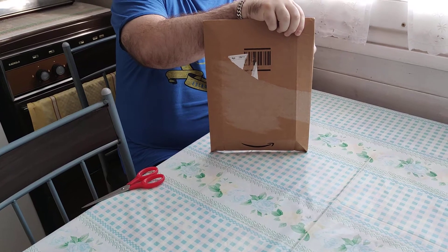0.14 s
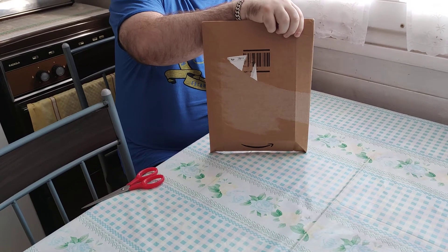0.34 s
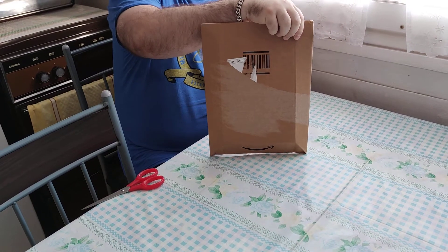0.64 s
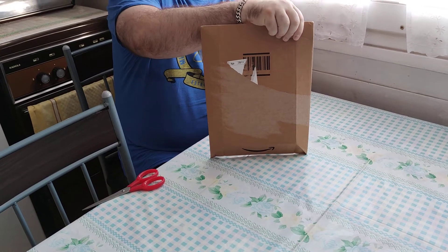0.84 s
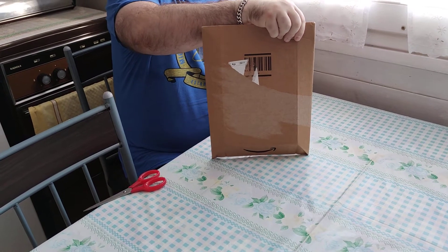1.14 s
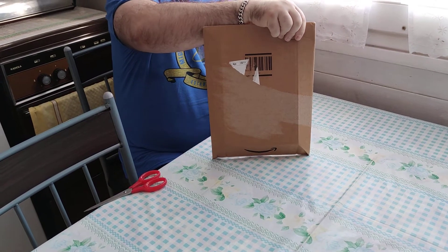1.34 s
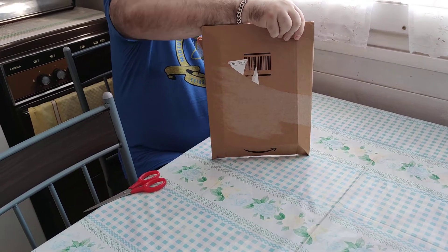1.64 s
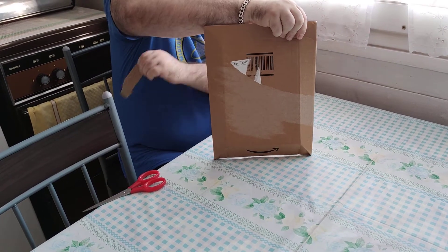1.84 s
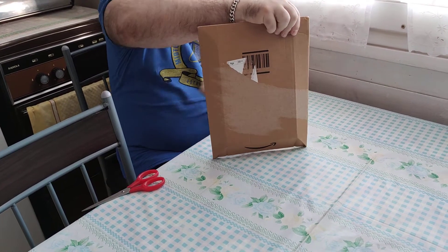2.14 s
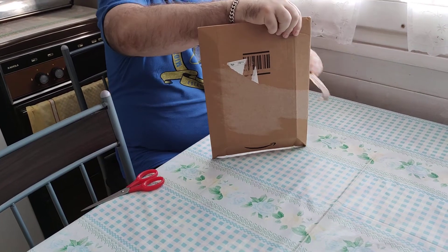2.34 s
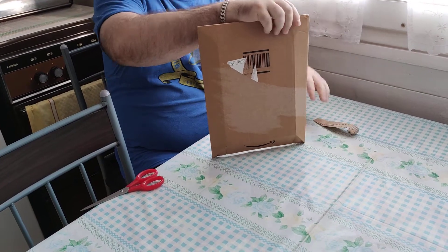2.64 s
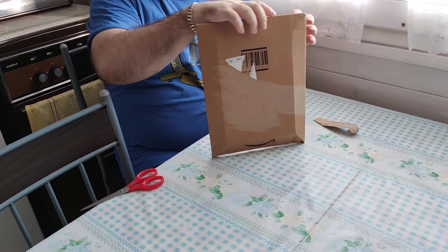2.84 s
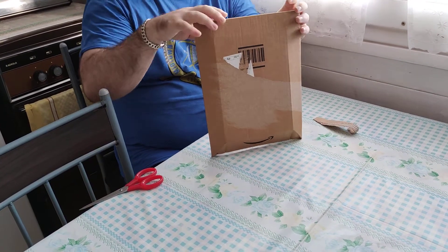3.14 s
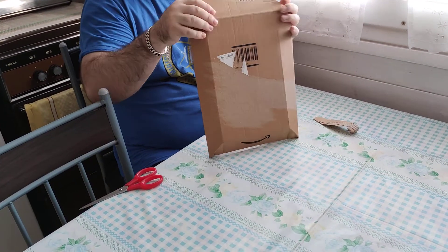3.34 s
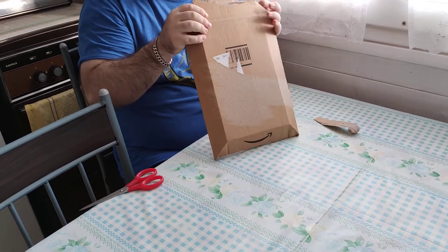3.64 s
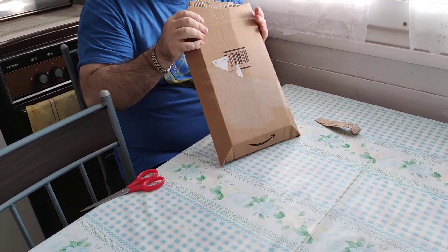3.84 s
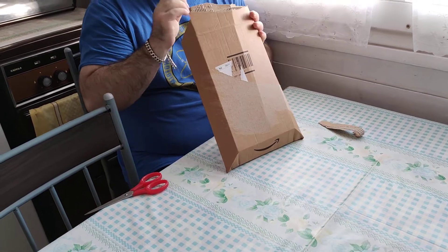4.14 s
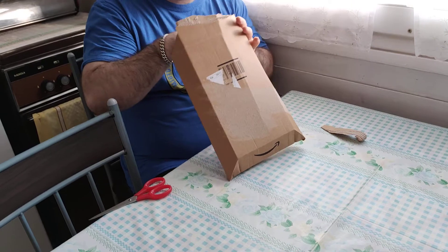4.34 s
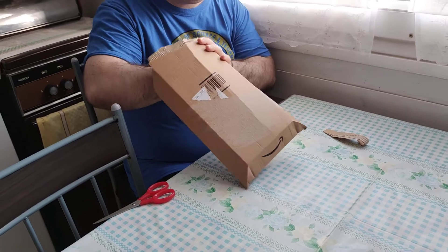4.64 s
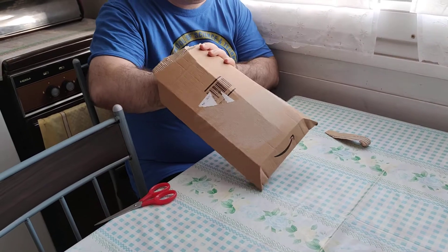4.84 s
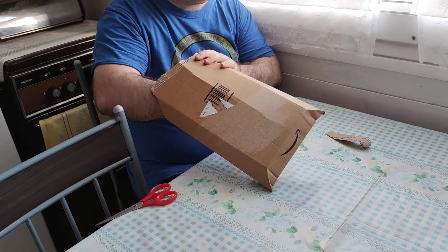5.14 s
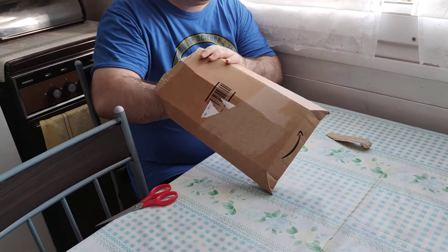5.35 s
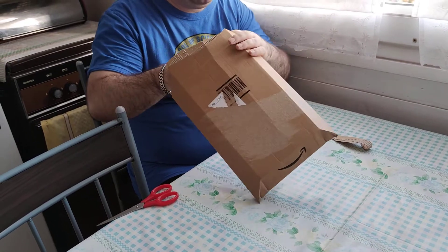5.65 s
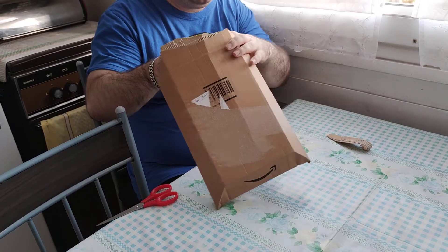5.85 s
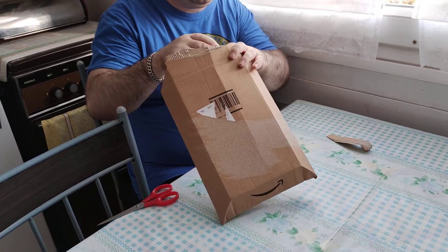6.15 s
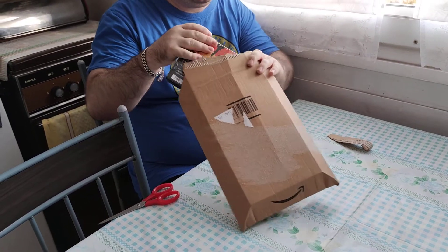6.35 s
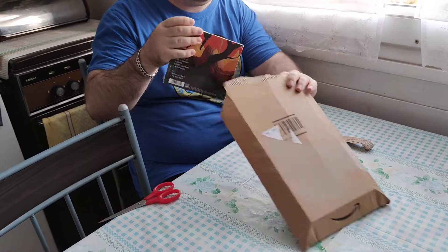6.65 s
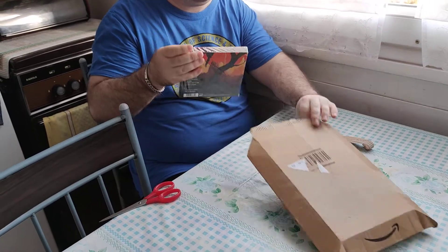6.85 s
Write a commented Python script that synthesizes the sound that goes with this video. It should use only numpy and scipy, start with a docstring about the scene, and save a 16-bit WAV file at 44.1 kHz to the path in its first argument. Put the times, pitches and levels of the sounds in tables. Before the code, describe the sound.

A cardboard mailer's strip is torn off in a few loud, crackling rips, followed by hollow rustling, scraping, knocks and pops in a small kitchen.

```python
"""Kitchen table, small hard room: the tear strip of a cardboard mailer is ripped off in a few quick pulls.
Fibres snap as random impulses in dense bunches, coloured by the flap and by modes of the panels.
Hands rub the card (filtered impulses), pop a panel and slide out a wrapped case, with knocks and scuffs.
Each layer passes through random room responses; room air and soft table bumps lie beneath."""
import sys
import numpy as np
from scipy import signal
from scipy.fft import rfft, irfft, next_fast_len
from scipy.io import wavfile
from scipy.ndimage import uniform_filter1d, map_coordinates

SR = 44100
rng = np.random.default_rng(int(sys.argv[2]) if len(sys.argv) > 2 else 0)


def transcribe(u):
    """Save the signal u as a 16-bit wav file named by the first command-line argument.

    u: samples, shape (n,) or (channels, n), limited to [-1, 1]; the rate is SR.
    q: integer samples, one column per channel.
    """
    v = np.clip(np.atleast_2d(u).T, -1, 1)
    q = np.round(v * 32767).astype(np.int16)
    wavfile.write(sys.argv[1], SR, q)


N = 309141  # samples

# All table levels are relative, before layer gains.
# Room air spectrum: [freq_hz, level_db]
AIR_SPECTRUM = [(15, -27), (25, 1.5), (114, -12), (591, -16), (1040, -24), (1230, -21), (2550, -25),
                (2990, -33), (7510, -29.5), (9320, -27.5), (16000, -34.5)]
# Soft table bumps and rumbles, bell-shaped: [centre_s, level_db, spread_s]
TABLE_BUMPS = [(.105, -52, 0.016), (.72, -60, 0.17), (2.15, -73, .08), (2.33, -60, 0.018),
               (3.76, -54, 0.034), (3.86, -54.5, 0.05), (5.55, -57, 0.07), (5.9, -53, 0.057),
               (6.47, -54, 0.034)]
# Left-right likeness of diffuse sound: [freq_hz, correlation]
EAR_LIKENESS = [(25, 0.056), (60, 0), (120, 0.66), (300, .88), (600, 0.59), (1200, 0), (3000, 0)]
# Room decay: [freq_hz, t60_s]
ROOM_DECAY = [(100, 0.26), (400, 0.3), (1000, 0.28), (2300, 0.32), (5000, 0.29), (8000, 0.31),
              (15000, 0.21)]

# Single hand strokes over the card: [start_s, length_s, hollow_db, scrape_db, hiss_db]
STROKE_EVENTS = [(0.0, 0.06, -61, -71.5, -69.5), (0.297, 0.17, -67.5, -69, -68.5),
                 (0.44, 0.095, -54, -62.5, -54.5), (0.551, 0.046, -52, -49.5, -55.5),
                 (0.695, 0.41, -56.5, -61, -61.5), (1.079, 0.091, -76, -62, -62),
                 (1.984, 0.16, -63, -57.5, -60.5), (2.241, 0.22, -83, -92.5, -77.5),
                 (2.55, .06, -70, -67, -52.5), (2.651, 0.29, -75, -57, -56), (2.857, 0.059, -50, -52, -52),
                 (2.968, .17, -54.5, -55.5, -54), (3.232, 0.3, -57, -55.5, -62),
                 (3.598, .07, -63, -47.5, -53.5), (3.825, 0.07, -51.5, -58, -62.5),
                 (3.957, 0.087, -56, -55.5, -55.5), (4.163, .09, -55, -79, -81),
                 (4.253, 0.126, -62, -64, -66), (4.426, 0.096, -60, -53.5, -46),
                 (4.605, 0.15, -48.5, -50.5, -51.5), (4.944, 0.017, -45, -53.5, -47.5),
                 (5.06, .05, -50.5, -60, -55), (5.19, 0.11, -45, -53, -80), (5.412, 0.11, -53, -55, -47.5),
                 (5.776, .13, -66, -52, -46), (6.146, 0.073, -51.5, -55.5, -54),
                 (6.708, 0.061, -51.5, -54.5, -53.5)]
# Steady rubbing inside the mailer, case sliding out: [time_s, hollow_db, scrape_db, hiss_db]
RUMMAGE_LEVELS = [(4.43, -54, -61, -73), (4.51, -63, -61.5, -65), (4.62, -67, -53, -44),
                  (4.72, -46.5, -51, -54.5), (5.12, -60.5, -58, -55.5), (5.38, -43.5, -49.5, -53),
                  (5.59, -48, -47.5, -50), (5.77, -54.5, -53, -53), (5.98, -60, -60, -58.5),
                  (6.63, -56, -58, -53.5), (6.78, -67, -64.5, -52), (7.0, -66, -65, -60)]
# Boom of the hollow mailer: [freq_hz, level_db]
HOLLOW_SPECTRUM = [(76, -33.5), (130, -9.5), (211, -9.5), (247, -12), (307, -1), (376, -11.5), (412, -1),
                   (454, -5.5), (834, -3.5), (904, -2), (1100, -14.5), (1430, -41.5), (2420, -120)]
# Card grain, middle band: [freq_hz, level_db]
SCRAPE_SPECTRUM = [(500, -30.5), (1000, -7), (1500, -4), (2300, -3), (3000, -13), (4500, -35.5)]
# Card grain, treble: [freq_hz, level_db]
HISS_SPECTRUM = [(1800, -31.5), (3000, 0.5), (5000, 1), (7400, 3), (11000, 3.5), (15000, -1)]
# Quick finger swipes along the open edge, bell-shaped: [centre_s, level_db, spread_s]
EDGE_SWIPES = [(3.461, -41, .013), (3.68, -45, 0.025)]

# Taps and buckling creases: [start_s, level_db, ring_hz, crack_db re the tap]
KNOCK_EVENTS = [(0.049, -54, 1520, 2.5), (0.48, -26, 1310, -22.5), (0.709, -39, 700, -17),
                (1.067, -45, 266, -25), (1.104, -41, 703, -23), (2.56, -51.5, 2100, -3.5),
                (2.677, -35, 294, -22.5), (3.239, -35.5, 290, -13.5), (3.492, -40.5, 310, -21),
                (3.754, -39.5, 310, -23), (3.887, -33.5, 860, -8), (4.181, -41.5, 404, -31.5),
                (4.253, -45.5, 564, -39), (4.555, -21, 725, -11.5), (4.959, -31, 2630, -6.5),
                (5.166, -28.5, 400, -16), (5.243, -33.5, 312, -19.5), (5.938, -37, 445, -7),
                (6.133, -36.5, 820, -19), (6.276, -37.5, 520, -16.5), (6.579, -34, 604, -37),
                (6.988, -29, 540, -17)]
# Dull body of a tap on card: [freq_hz, level_db]
TAP_SPECTRUM = [(70, -12.5), (170, -3.5), (300, 1), (500, -4.5), (1000, -6.5), (2000, -7), (3500, -19.5),
                (9000, -31.5)]
# Crack of a tap: [freq_hz, level_db]
CRACK_SPECTRUM = [(1500, 4.5), (3500, 0), (7000, -0.5), (10000, -3), (16000, -11.5)]
# Card drags and judders at one pitch, bell-shaped: [centre_s, level_db, spread_s, pitch_hz]
SCUFF_EVENTS = [(0.128, -60.5, 0.043, 270), (2.9, -54, 0.029, 437), (4.487, -49.5, 0.014, 468),
                (4.62, -47, 0.017, 740), (5.287, -44, 0.019, 770), (5.856, -45.5, 0.041, 400),
                (6.22, -49, 0.033, 1430), (6.545, -47.5, 0.076, 755)]

# Pulls on the strip; the free flap rings differently as the tear moves on:
# [start_s, rise_s, hold_s, release_t60_s, snap_db, thrum_db, flap_hz, flap_width_hz, flap_db]
STRIP_PULLS = [(0.866, 0.014, 0.014, 0.064, -28.5, -42, 4780, 688, 5),
               (1.231, 0.022, 0.094, 0.042, -40, -58.5, 2470, 417, 0.5),
               (1.361, 0.031, .055, 0.071, -13.5, -26.5, 2494, 423, 8),
               (1.606, 0.02, 0.053, .17, -16, -29.5, 7100, 540, -7.5),
               (1.799, 0.031, 0.01, 0.057, -15, -21.5, 1316, 261, 9.5)]
# Tough spots giving way: [start_s, snap_db, thrum_db]
TEAR_JERKS = [(0.871, -15.5, -26), (0.881, -21.5, -29), (1.238, -37, -44), (1.277, -24, -41.5),
              (1.366, -15.5, -29), (1.449, -15, -39.5), (1.607, -14.5, -44), (1.622, -13.5, -31),
              (1.799, -25.5, -25), (1.832, -10.5, -30)]
# Snapping fibres: [freq_hz, level_db]
FIBRE_SPECTRUM = [(60, -37.5), (150, -21), (500, -8.5), (900, -6), (1080, -4.5), (1300, -4), (2000, 2),
                  (2700, -2.5), (3600, -4.5), (4700, 0), (6000, -0.5), (7400, 1.5), (16000, -5)]
# Panel modes: [centre_hz, width_hz, level_db]
PANEL_MODES = [(96.1, 8.2, 1.5), (179, 51, 1.5), (209, 55, 3), (312, 31, 3), (402.6, 39, 1), (538, 45, -1),
               (681, 46, -2), (775, 38, -1)]
# Kitchenware modes: [freq_hz, level_db, t60_s]
METAL_MODES = [(1245, -5, 0.88), (1940, -2.5, 0.57), (2170, -2.5, 0.5), (2675, -4.5, 1), (3360, -9.5, 0.6),
               (6573, -11.5, 0.76)]

# A panel flips over with a hollow pop: [start_s, level_db, pitch_hz, t60_s]
POP_EVENTS = [(4.561, -43, 720, 0.036), (5.372, -13, 430, 0.013), (5.392, -22.5, 432, 0.057),
              (6.579, -35.5, 392, 0.023)]
# Microphone treble response: [freq_hz, level_db]
MIC_RESPONSE = [(7700, 0), (8300, -8.5), (9200, -16.5), (12000, -12), (15000, -9)]

STROKE_ATTACK_S, STROKE_T60_S, STROKE_SAG_DB_PER_S = 0.03, 0.39, 6
RUMMAGE_DB = -1
CRINKLE_PER_S, CRINKLE_DB = 52, -7.5  # mean crease rate; level re the scrape gain
BITE_DB = 10.5  # a pull starts this far under full strength
JERK_T60_S = 0.028
TOP_HZ = 16000  # band limit


def amp(db):
    """Decibels to gain."""
    return 10 ** (np.asarray(db) / 20)


def unit(x):
    """Scale to rms 1."""
    return x / np.sqrt(np.mean(x ** 2) + 1e-20)


def along(points, hz):
    """Table of (freq_hz, value) interpolated on a log frequency axis."""
    f, values = np.transpose(points)
    return np.interp(np.log(hz + 1), np.log(f + 1), values)


def clock():
    """Time of each sample, s."""
    return np.arange(N) / SR


def gains(rows):
    """A gain curve per dB column, near silent outside the table's times."""
    times_s, *columns = np.transpose(rows)
    return [amp(np.interp(clock(), times_s, db, left=-120, right=-120)) for db in columns]


def swells(rows):
    """Sum of Gaussian rises of level."""
    return sum(amp(db) * np.exp(-.5 * ((clock() - s) / spread_s) ** 2) for s, db, spread_s in rows)


def wobble(rate_hz):
    """Smooth random curve through rate_hz random knots a second."""
    knots = rng.standard_normal(int(N * rate_hz / SR) + 4)
    return map_coordinates(knots, [clock() * rate_hz])


def filtered(x, response):
    """Apply a response of frequency by FFT, padded against wrap-around."""
    size = next_fast_len(N + SR // 2)
    spectrum = rfft(x, size) * response(np.fft.rfftfreq(size, 1 / SR))
    return irfft(spectrum, size)[..., :N]


def coloured(x, spectrum):
    """Filter by a (freq_hz, level_db) table, then scale to rms 1."""
    return unit(filtered(x, lambda hz: amp(along(spectrum, hz))))


def resonance(f, centre_hz, width_hz, db):
    """Complex response of one damped mode."""
    return amp(db) * 1j * f * width_hz / (centre_hz ** 2 - f ** 2 + 1j * f * width_hz)


def snaps(rate_hz, spread_db):
    """Impulses at random times, of random sign and widely varying size, rms 1."""
    size = amp(spread_db * np.clip(rng.standard_normal(N), -2, 2))
    sign = rng.choice([-1, 1], N)
    return unit(size * sign * (rng.random(N) < rate_hz / SR))


def diffuse(size):
    """Stereo noise whose left-right correlation follows EAR_LIKENESS."""
    likeness = np.clip(along(EAR_LIKENESS, np.fft.rfftfreq(size, 1 / SR)), -1, 1)
    turn = np.arccos(likeness) / 2
    noise = rfft(rng.standard_normal((2, size)))
    mid, side = irfft(noise * [np.cos(turn), np.sin(turn)], size)
    return np.array([mid + side, mid - side])


def kitchen(wet_db, early_db, lag_s):
    """Room response: direct sound, dense early reflections and a short diffuse tail."""
    size = SR // 3
    hz, frame_s, z = signal.stft(diffuse(size), SR, nperseg=256)
    decay = amp(-60 * frame_s / along(ROOM_DECAY, hz)[:, None])
    tail = signal.istft(z * decay, SR, nperseg=256)[1][:, :size]
    t = np.arange(tail.shape[1]) / SR
    tail = tail * (1 - np.exp(-t / 0.0049))
    early = diffuse(len(t)) * np.exp(-t / 0.0059)
    answer = amp(wet_db) * tail / np.linalg.norm(tail[0])
    answer = answer + amp(early_db) * early / np.linalg.norm(early[0])
    answer[0, int(abs(lag_s) * SR)] += 1  # direct sound, later at left
    answer[1, 0] += 1
    return answer / np.linalg.norm(answer[0])


def moving(x, wet_db, early_db, lag_s, count=24):
    """Hands and mailer move: crossfaded stretches each get a freshly drawn room response."""
    out, hop = np.zeros((2, N + 3 * SR)), N // count + 1
    fade = np.sin(np.pi * (np.arange(2 * hop) + .5) / (2 * hop)) ** 2
    x = np.pad(x, (hop, 2 * hop))
    for start in range(0, N + hop, hop):
        stretch = x[start:start + 2 * hop] * fade
        part = signal.fftconvolve(stretch[None], kitchen(wet_db, early_db, lag_s), axes=1)
        out[:, start:start + part.shape[1]] += part
    return out[:, hop:hop + N]


def bassless(x, corner_hz):
    """High-pass: a light sheet of card radiates no deep bass."""
    return signal.sosfilt(signal.butter(3, corner_hz, "highpass", fs=SR, output="sos"), x)


def background():
    """Steady diffuse room air, plus low-frequency noise swells for the table bumps."""
    rumble = coloured(diffuse(N), [(20, 0), (40, 33), (130, 25), (300, -19), (700, -50)])
    bumps = swells(TABLE_BUMPS) * rumble
    return amp(-59) * coloured(diffuse(N), AIR_SPECTRUM) + bumps


def hands():
    """Strokes and rummaging added in power; returns gains of (hollow, scrape, hiss)."""
    power, t = np.zeros((3, N + SR)), np.arange(SR) / SR
    for s, length_s, *levels_db in STROKE_EVENTS:
        lift_db = 60 * np.maximum(t - length_s, 0) / STROKE_T60_S
        fall_db = STROKE_SAG_DB_PER_S * t + lift_db
        shape = np.minimum(t / STROKE_ATTACK_S, 1) * amp(-fall_db)
        power[:, round(s * SR):][:, :SR] += np.outer(amp(levels_db), shape) ** 2
    rummage = amp(RUMMAGE_DB) * np.array(gains(RUMMAGE_LEVELS))
    return np.sqrt(power[:, :N] + rummage ** 2)


def patchy(x, depth_db, size=7):
    """Contact points wander over the card: a smoothed random time-frequency gain shifts its colour."""
    z = signal.stft(x, nperseg=512)[2]
    field = rng.standard_normal(z.shape)
    for axis in (0, 0, 1, 1):
        field = uniform_filter1d(field, size, axis)
    return unit(signal.istft(z * amp(depth_db * unit(field)), nperseg=512)[1][:N])


def rubbing():
    """Skin and wrap catch on the card's grain; the hollow of the mailer booms along."""
    body, scrape, hiss = hands()
    grip = unit(amp(1.4 * wobble(45)))
    hollow = body * amp(0.994 * wobble(25))
    hollow = hollow * coloured(snaps(rate_hz=1300, spread_db=2.5), HOLLOW_SPECTRUM)
    grain = coloured(snaps(rate_hz=2200, spread_db=4.5), SCRAPE_SPECTRUM)
    grain = scrape * amp(4) * patchy(grain, depth_db=2)
    fizz = coloured(snaps(rate_hz=11000, spread_db=4.5), HISS_SPECTRUM)
    fizz = hiss * amp(8.5) * patchy(fizz, depth_db=2)
    edge_spectrum = [(200, -3.5), (700, -1), (2000, 3), (4000, -1), (14000, -7.5)]
    edge = coloured(snaps(rate_hz=5500, spread_db=5.5), edge_spectrum)
    swipes = swells(EDGE_SWIPES) * amp(6.5) * edge
    crease_spectrum = [(300, -14.5), (1500, 1.5), (7000, -3.5), (15000, -7)]
    creases = coloured(snaps(rate_hz=CRINKLE_PER_S, spread_db=3), crease_spectrum)
    crinkle = scrape * amp(CRINKLE_DB) * creases
    return grip * (hollow + grain + fizz + swipes + crinkle)


def noise_burst(size, colour):
    """White noise shaped by a response, rms 1."""
    return unit(irfft(rfft(rng.standard_normal(size)) * colour, size))


def knocks():
    """Each tap is a brief crack and a dull, quickly damped ring of the card."""
    out, t = np.zeros(N + SR), np.arange(SR // 8) / SR
    f = np.fft.rfftfreq(len(t), 1 / SR)
    onset = 1 - np.exp(-t / 0.00069)
    for s, db, ring_hz, crack_db in KNOCK_EVENTS:
        low_cut = f / np.hypot(f, ring_hz / 2)
        ring = low_cut * (0.5 + resonance(f, ring_hz, ring_hz / 2, db=-5))
        thud = noise_burst(len(t), amp(along(TAP_SPECTRUM, f)) * ring) * amp(-60 * t / .04)
        crack = noise_burst(len(t), amp(along(CRACK_SPECTRUM, f))) * amp(-60 * t / .02)
        hit = amp(db + 2) * thud + amp(db + crack_db + 17.5) * crack
        out[round(s * SR):][:len(t)] += hit * onset
    return out[:N]


def scuffs():
    """Stick and slip excite one resonance of the card at a time."""
    judder = snaps(rate_hz=390, spread_db=2)
    out = np.zeros(N)
    for s, db, spread_s, hz in SCUFF_EVENTS:
        tone = unit(filtered(judder, lambda f: resonance(f, hz, 0.37 * hz, db=0) ** 2))
        out += swells([(s, db + 0.5, spread_s)]) * tone
    return out


def gesture(s, attack_s, hold_s, t60_s, bite_db):
    """Gain of a pull: starts bite_db under full strength, builds, holds and dies away."""
    t = clock() - s
    build_db = -bite_db * np.clip(1 - t / attack_s, 0, 1)
    db = build_db - 60 * np.maximum(t - attack_s - hold_s, 0) / t60_s
    return (t >= 0) * amp(np.maximum(db, -200))


def jerks(pull):
    """Sudden decaying releases nearest in time to one pull; returns gains of (snap, thrum)."""
    out, t = np.zeros((2, N)), np.arange(SR // 8) / SR
    for s, *levels_db in TEAR_JERKS:
        nearest = np.argmin([abs(s - row[0]) for row in STRIP_PULLS])
        if nearest == pull:
            release = np.outer(amp(levels_db), amp(-60 * t / JERK_T60_S))
            out[:, round(s * SR):][:, :len(t)] += release
    return out


def panel_response(f):
    """Sum of the panel modes with alternating sign."""
    return sum((-1) ** k * resonance(f, *mode) for k, mode in enumerate(PANEL_MODES))


def tear():
    """Fibres snap in bunches that colour the flap and shake the panels; returns (crackle, thrum)."""
    crackle, drum = np.zeros((2, N))
    for pull, row in enumerate(STRIP_PULLS):
        s, rise_s, hold_s, t60_s, snap_db, thrum_db, flap_hz, width_hz, flap_db = row
        envelope = gesture(s, rise_s, hold_s, t60_s, BITE_DB)
        ripping = np.outer(amp([snap_db, thrum_db]), envelope)
        snap, thrum = np.hypot(ripping, jerks(pull))
        bunches = unit(amp(3.8 * wobble(330)))
        fibres = snaps(rate_hz=3500, spread_db=4.5) * bunches

        def flap_response(f):
            """Fibre spectrum with the free flap's resonance."""
            return amp(along(FIBRE_SPECTRUM, f)) * (2.5 + resonance(f, flap_hz, width_hz, flap_db))

        crackle += snap * unit(filtered(fibres, flap_response))
        drum += thrum * unit(filtered(fibres, panel_response))
    return crackle, drum


def kitchenware(x):
    """Metal things in the room ring along faintly: decaying sines, random phase per side."""
    t = np.arange(SR) / SR
    ring = np.zeros((2, SR))
    for hz, db, t60_s in METAL_MODES:
        ring += amp(db - 60 * t / t60_s) * np.sin(2 * np.pi * (hz * t + rng.random((2, 1))))
    return amp(-66) * signal.fftconvolve(x[None], ring, axes=1)[:, :N]


def pops():
    """A panel flips with a crack and rings the air inside the mailer."""
    out, t = np.zeros(N + SR), np.arange(SR // 8) / SR
    onset = 1 - np.exp(-t / 0.00055)
    for s, db, hz, t60_s in POP_EVENTS:
        swing = np.sin(2 * np.pi * hz * t) + amp(-14) * np.sin(2 * np.pi * 235 * t)
        crack = unit(signal.lfilter([1], [1, -.85], rng.standard_normal(len(t))))
        decay = amp(db + 5 - 60 * t / t60_s)
        out[round(s * SR):][:len(t)] += decay * (swing + amp(-12.5) * crack) * onset
    return out[:N]


def scene():
    """Put each layer in the room, balance slightly to the left, add the background."""
    crackle, drum = tear()
    ripped = moving(crackle, wet_db=1, early_db=2.5, lag_s=.0001, count=8) + kitchenware(crackle)
    shaken = moving(drum, wet_db=-1.5, early_db=-9.5, lag_s=.00005, count=12)
    rubbed = moving(rubbing() + scuffs(), wet_db=0, early_db=3, lag_s=.00004, count=40)
    tapped = moving(bassless(knocks(), corner_hz=129), wet_db=4, early_db=2.5, lag_s=.00008, count=12)
    popped = moving(bassless(pops(), corner_hz=156), wet_db=-2.5, early_db=-3.5, lag_s=.00005, count=12)
    mix = amp(5) * ripped + amp(0.5) * shaken + rubbed + tapped + popped
    return mix * amp([[.35], [-.35]]) + background()


def record(dry):
    """Microphone: dulled treble, softly rounded peaks, then a sharp band limit."""
    x = filtered(dry, lambda hz: amp(along(MIC_RESPONSE, hz)))
    x = x / (1 + (x / .88) ** 6) ** (1 / 6)
    return filtered(x, lambda hz: hz < TOP_HZ)


dry = scene()
out = record(dry)
transcribe(out)
```